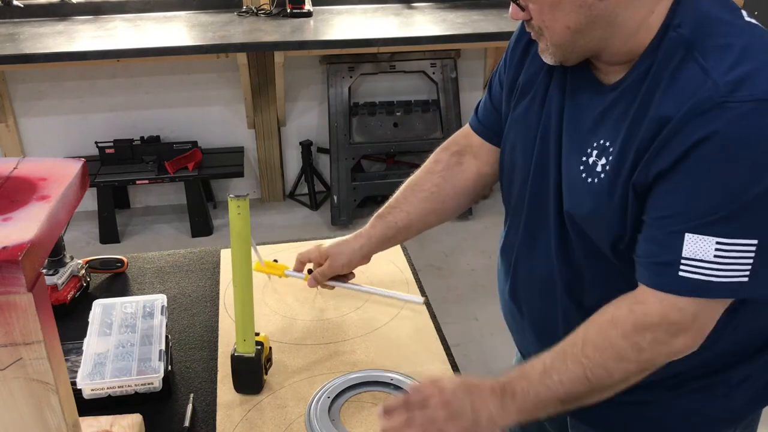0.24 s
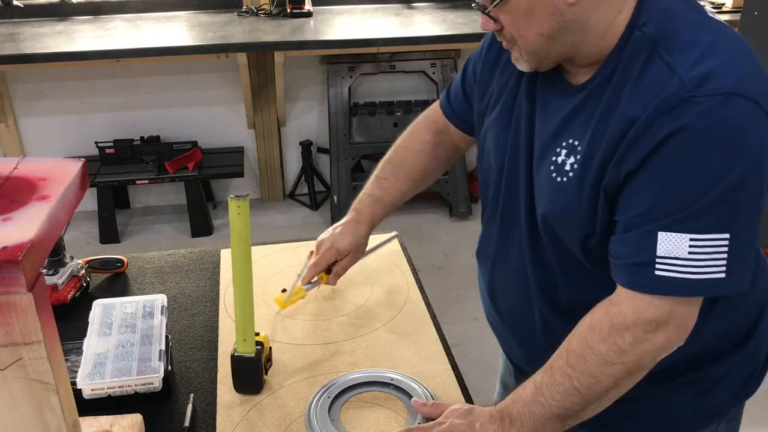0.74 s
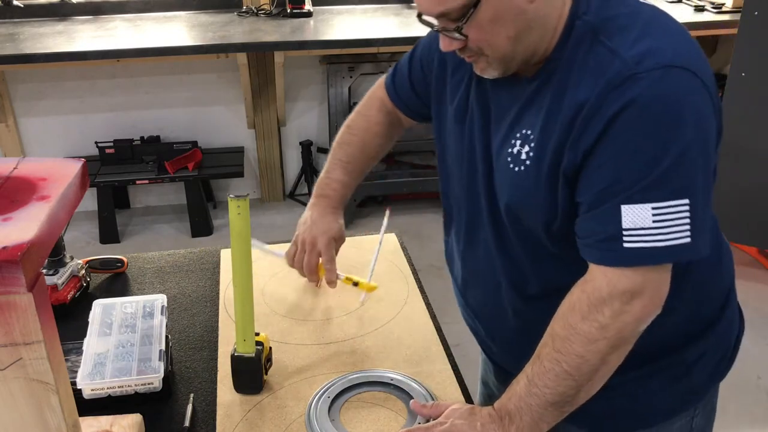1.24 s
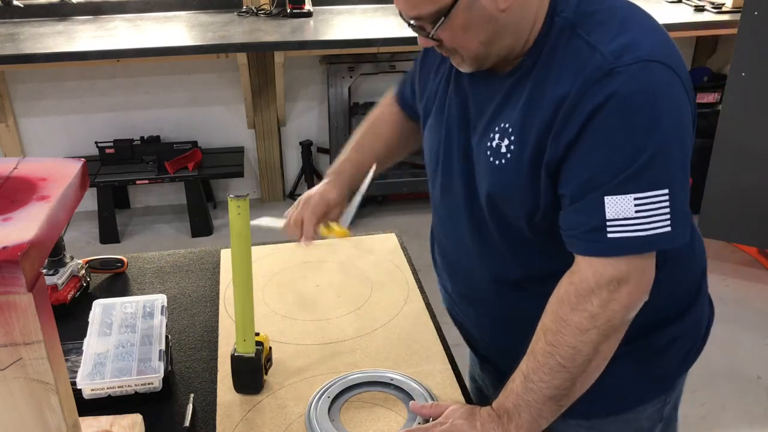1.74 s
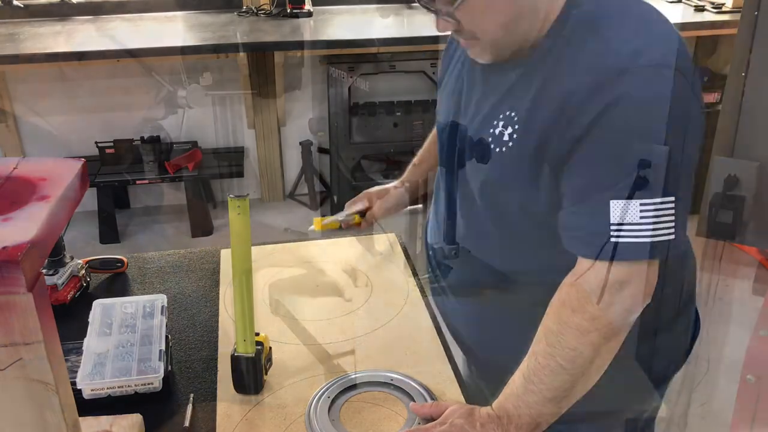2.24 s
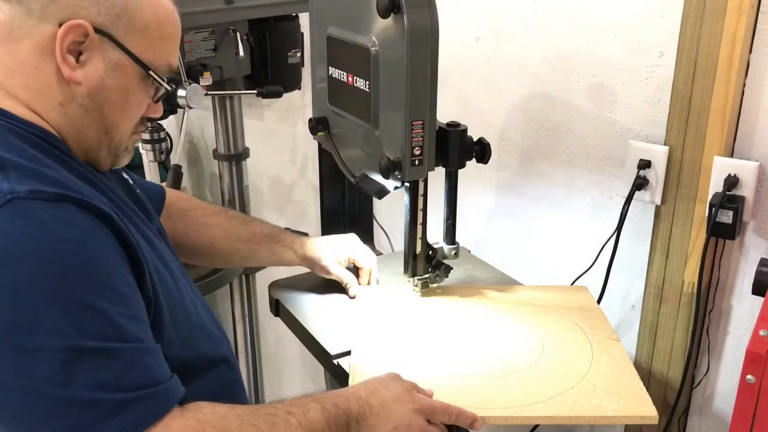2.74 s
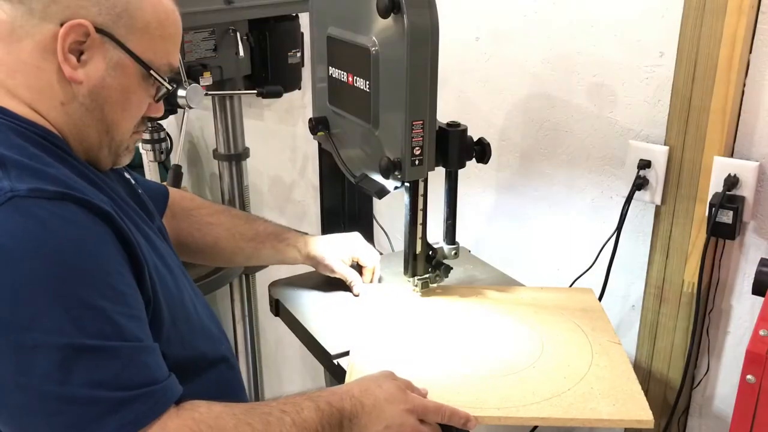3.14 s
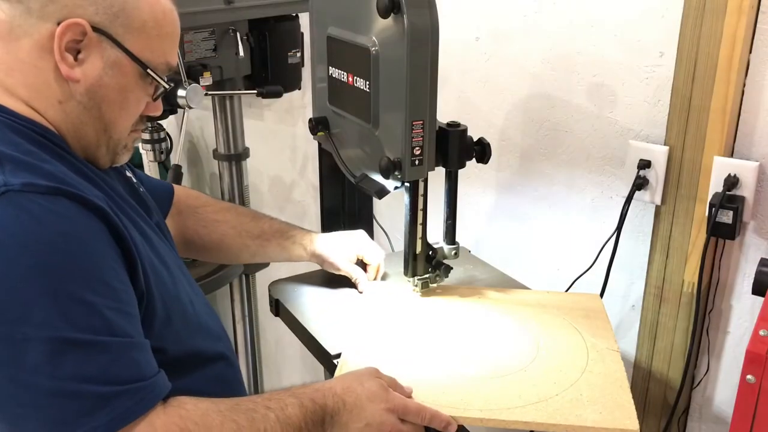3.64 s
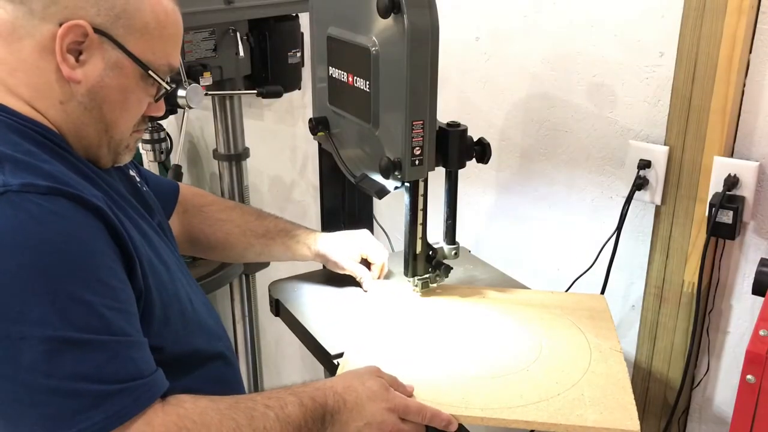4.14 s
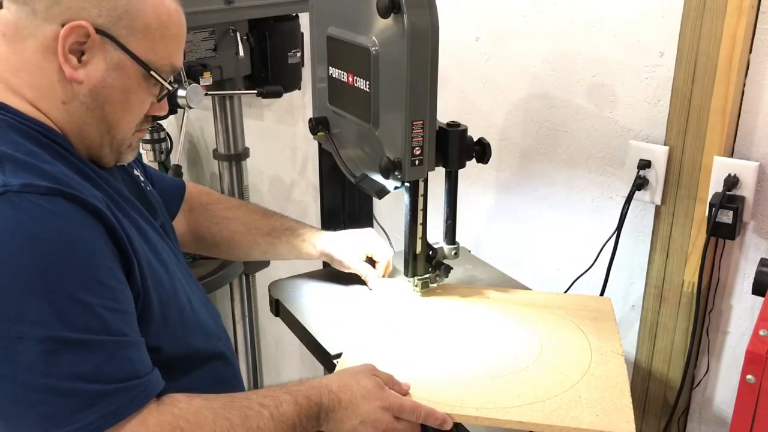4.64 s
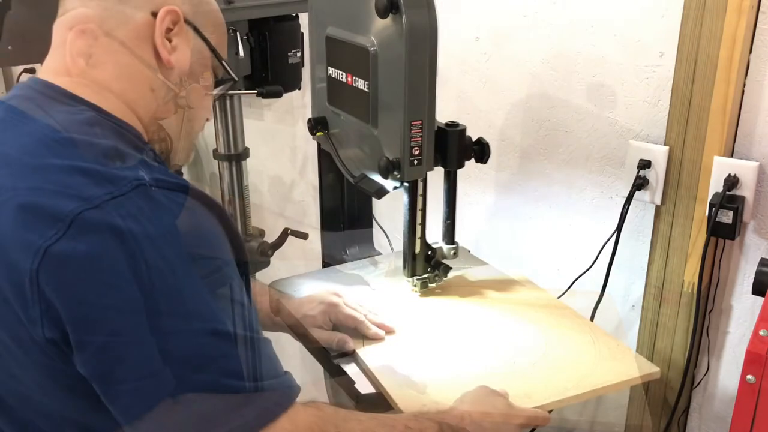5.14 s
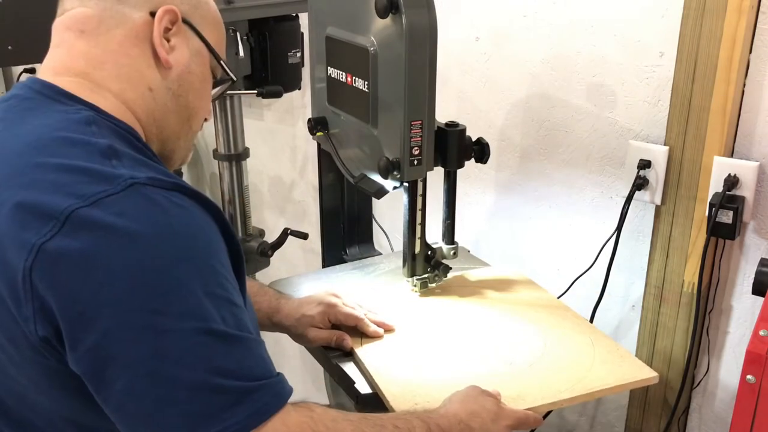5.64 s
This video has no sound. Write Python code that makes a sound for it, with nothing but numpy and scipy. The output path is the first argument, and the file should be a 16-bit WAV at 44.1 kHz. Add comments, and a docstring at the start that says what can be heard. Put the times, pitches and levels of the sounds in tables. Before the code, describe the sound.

After faint pencil scratching over a ventilation rumble, a band saw hums and rasps through a wooden board, its blade squealing briefly.

```python
"""A band saw cuts a curve in a board, heard close up in a home workshop.
Its motor hums, its teeth chop and tear the fibres, and the blade squeals as it twists in the kerf.
Before it, at the quiet bench, a pencil compass scratches a circle over the rumble of the ventilation.
The bench dissolves into one shot of the saw, and that shot into a second. The sound is mono."""
import sys
import numpy as np
from scipy import signal
from scipy.fft import rfft, irfft
from scipy.io import wavfile

SR = 44100
rng = np.random.default_rng(int(sys.argv[2]) if len(sys.argv) > 2 else 0)


def transcribe(u):
    """Save the signal u as a 16-bit wav file named by the first command-line argument.

    u: samples, shape (n,) or (channels, n), limited to [-1, 1]; the rate is SR.
    q: integer samples, one column per channel.
    """
    v = np.clip(np.atleast_2d(u).T, -1, 1)
    q = np.round(v * 32767).astype(np.int16)
    wavfile.write(sys.argv[1], SR, q)


N = 259308


def from_db(db):
    return 10 ** (np.asarray(db) / 20)


def unit_rms(x):
    return x / np.sqrt(np.mean(x ** 2) + 1e-20)


def curve(rows):
    """Straight lines through (seconds, value) rows, at every sample."""
    return np.interp(np.arange(N) / SR, *np.transpose(rows))


def dissolve(start_s, end_s):
    """A straight rise from 0 to 1."""
    return curve([(start_s, 0), (end_s, 1)])


def burst(middle_s, half_length_s):
    """A smooth rise from 0 to 1 and back."""
    along = np.clip((np.arange(N) / SR - middle_s) / half_length_s, -1, 1)
    return np.cos(np.pi / 2 * along) ** 2


def phase_of(hz):
    """Running phase in radians of a changing frequency."""
    return 2 * np.pi * np.cumsum(hz) / SR


def drift(rate_hz):
    """Smooth random wander with a spread of about 1."""
    step, settle = 40, 2000  # samples per point, points for the filter to settle
    pole = np.exp(-2 * np.pi * step * rate_hz / SR)
    noise = rng.standard_normal(N // step + settle + 2)
    slow = signal.lfilter([1], [1, -2 * pole, pole * pole], noise)[settle:]
    return np.interp(np.arange(N) / step, np.arange(len(slow)), unit_rms(slow))


def coloured(x, spectrum):
    """Shape a signal by (Hz, dB) rows; the result has rms 1."""
    hz, db = np.transpose(spectrum)
    bin_hz = np.maximum(np.fft.rfftfreq(N, 1 / SR), 1)
    gain = from_db(np.interp(np.log(bin_hz), np.log(hz), db))
    return unit_rms(irfft(rfft(x) * gain, N))


def resonances(modes, waver_db=0):
    """Random shaking rings each mode, with a strength that may waver."""
    out = 0
    for hz, width_hz, db in modes:
        b, a = signal.iirpeak(hz, hz / (1.5 * width_hz), fs=SR)
        ringing = signal.lfilter(b, a, rng.standard_normal(N))
        ringing = unit_rms(signal.lfilter(b, a, ringing))  # a second pass steepens the skirts
        out = out + from_db(db + waver_db * drift(8.3)) * ringing
    return out


def grains(per_s, spread_db):
    """Random clicks of uneven size."""
    clicks = (rng.random(N) < per_s / SR) * rng.standard_normal(N)
    size_db = spread_db * np.clip(rng.standard_normal(N), -2, 2)
    return unit_rms(clicks * from_db(size_db))


def ventilation(rumble_db=-38.5):
    """Room tone of the workshop: moving air rumbles and rings the duct."""
    # Spectrum of the air. Each row: frequency in Hz, relative level in dB.
    air_spectrum = [(15, -54), (25, -59), (59, -2), (111, -7), (145, 0), (170, -10), (206, -2.5), (270, -8),
                    (335, -11), (373, -9), (427, -19.5), (962, -23.5), (1040, -23), (3720, -35),
                    (16000, -57.5)]
    # Duct resonances. Each row: frequency in Hz, width in Hz, level in dB.
    duct_modes = [(65, 12, -51), (136.4, 8.4, -48.5), (219.3, 10, -45.5), (269, 6.6, -48),
                  (296, 10.4, -47.5), (362, 22, -54.5), (452, 19, -54.5), (1020, 6.2, -61), (1110, 50, -72),
                  (3270, 60, -70)]
    rumble = coloured(rng.standard_normal(N), air_spectrum)
    return from_db(rumble_db) * rumble + resonances(duct_modes)


def pencil_compass(grain_db=-7, fade_db_per_s=65):
    """At the bench, the lead scratches over the grain and rings board and compass, then lifts."""
    # Pressure of the lead through one sweep. Each row: time in seconds, gain in dB.
    pressure = [(0, -74), (.18, -68), (.43, -62.5), (.54, -66), (.71, -58), (.9, -65.5), (1.1, -58.5),
                (1.25, -64.5), (1.39, -60.5)]
    # Resonances of board and compass legs. Each row: frequency in Hz, width in Hz, relative level in dB.
    compass_modes = [(514, 210, 5), (1500, 790, -1.5), (4170, 420, -2.5), (6000, 400, -10),
                     (6650, 480, -7.5), (7070, 300, -11), (9700, 500, -16), (11950, 700, -11),
                     (13100, 700, -11), (15000, 750, -11)]
    scratch = from_db(grain_db) * grains(per_s=7000, spread_db=2.5)
    ringing = resonances(compass_modes, waver_db=3.0)
    since_lift_s = np.maximum(np.arange(N) / SR - pressure[-1][0], 0)
    return (scratch + ringing) * from_db(curve(pressure) - fade_db_per_s * since_lift_s)


def motor(second_shot, hum_hz=335.05, wobble=0.00038, flutter_db=0.4, gain_db=-0.02):
    """The motor hums with fluttering overtones, over steady tones of the drive and frame."""
    # Slow swell of the fundamental. Each row: time in seconds, gain in dB.
    swell = [(3.7, 1), (4.75, -1.1), (5.05, -0.5), (5.3, 0.6), (5.88, -0.1)]
    # Harmonics of the hum. Each row: multiple, level in dB in the first shot, level in dB in the second.
    harmonics = [(1, -21, -18), (2, -40, -38), (3, -30.7, -31), (4, -35, -38), (5, -37, -31), (6, -32, -33),
                 (7, -44, -37), (8, -36, -39), (9, -33, -33), (10, -31, -36), (11, -44, -56),
                 (13, -43, -48), (18, -42, -47), (30, -51, -56), (36, -44, -45)]
    # Tones of the drive and frame. Each row: frequency in Hz, level in dB.
    frame_tones = [(120, -47), (216, -46), (458, -52), (884, -48), (1460, -40.5), (1560, -45)]
    phase = phase_of(hum_hz * (1 + wobble * drift(6.3)))
    out = 0
    for order, first_db, second_db in harmonics:
        unrest_db = curve(swell) + 0.18 * drift(8.7) if order == 1 else flutter_db * drift(10.0)
        level_db = gain_db + first_db + (second_db - first_db) * second_shot + unrest_db
        out = out + from_db(level_db) * np.sin(order * phase + rng.uniform(0, 2 * np.pi))
    for hz, db in frame_tones:
        strength = from_db(db + 2.2 * drift(3.8))
        out = out + strength * np.sin(phase_of(hz + 1.2 * drift(3.7)))
    return np.sqrt(2) * out


def housing(gain_db=-1.24):
    """The steady cut shakes the housing and the blade, and they ring."""
    # Their resonances. Each row: frequency in Hz, width in Hz, relative level in dB.
    housing_modes = [(154, 33, -39), (1667, 130, -29), (3375, 70, -32.5), (6920, 590, -35),
                     (11500, 260, -38.5)]
    return from_db(gain_db) * resonances(housing_modes)


def fibre_rasp(tooth_phase, level_db=-18, tooth_depth=0.24, flicker_db=-0.08):
    """Fibres snap in dense clicks, most as a left- or right-set tooth enters the wood."""
    # What board, blade and table radiate. Each row: frequency in Hz, relative level in dB.
    rasp_spectrum = [(50, -18.5), (220, -6.5), (500, -6.5), (750, -7), (1200, 0), (1700, 0.5), (2300, 0.5),
                     (3400, 1.5), (4700, -2), (5900, -0.5), (7600, -8), (8700, -5.5), (10400, -11.5),
                     (12400, -7), (15500, -10.5)]
    entering = 1 + tooth_depth * np.cos(2 * tooth_phase)
    snaps = grains(per_s=26000, spread_db=0.6) * entering * from_db(flicker_db * drift(61))
    return from_db(level_db) * coloured(snaps, rasp_spectrum)


def tooth_whine(tooth_phase, second_shot, weave_hz=8.5, weave_depth=0.5, chatter_db=2.53, slip_rad=.024):
    """The teeth strike in a steady pattern; each harmonic throbs as the blade weaves in the kerf."""
    # Tooth harmonics. Each row: multiple, level in dB in the first shot, level in dB in the second.
    harmonics = [(2, -31.5, -36.5), (4, -34.5, -32.5), (6, -30, -27.5), (7, -46, -39), (8, -34, -38),
                 (9, -39.5, -33), (10, -40, -38), (12, -36, -32.5), (14, -42, -37), (15, -43, -47),
                 (16, -43, -38), (18, -45, -50), (20, -43, -40), (22, -43, -40), (24, -49, -44),
                 (26, -49, -40)]
    # The teeth dig in and one harmonic rings out.
    # Each row: middle in seconds, half-length in seconds, multiple, level in dB.
    bites = [(2.75, 0.19, 2, -24.5), (2.76, .08, 4, -29), (2.85, 0.22, 8, -27.5), (3.02, 0.056, 4, -29),
             (3.28, 0.19, 8, -28), (3.61, .07, 4, -27.5), (3.68, 0.087, 6, -24), (3.9, 0.15, 2, -26),
             (4.003, .07, 8, -23.5), (4.19, .05, 4, -25), (4.352, .06, 12, -29), (4.38, .06, 2, -25),
             (4.385, .05, 4, -26.5), (4.91, .1, 6, -24), (5.46, .08, 6, -21.5), (5.852, 0.055, 6, -17)]
    out = 0
    for order, first_db, second_db in harmonics:
        throb = 1 + weave_depth * np.sin(phase_of(weave_hz * (1 + 0.4 * drift(4.09))))
        strength = throb * from_db(first_db + (second_db - first_db) * second_shot)
        for middle_s, half_length_s, multiple, db in bites:
            if round(multiple) == order:
                strength = strength + (from_db(db) - strength) * burst(middle_s, half_length_s)
        slipped_phase = tooth_phase + slip_rad * drift(29)  # small slips blur the higher harmonics
        tone = np.sin(order * slipped_phase + rng.uniform(0, 2 * np.pi))
        out = out + strength * from_db(chatter_db * drift(37)) * tone
    return np.sqrt(2) * out


def blade_squeals(sag_hz_per_s=250, quaver_hz=14, rough_db=3.5, gain_db=-4):
    """The twisted blade rubs the side of the kerf and sings; the rubbing drags each squeal flat. The last row
    is no squeal: it is a brief tone near 3440 Hz that joins the sixth tooth harmonic as it rings out at 5.85 s."""
    # Each row: middle in seconds, half-length in seconds, pitch in Hz, relative level in dB. The last row adds
    # to the sixth tooth harmonic ringing out near 5.85 s.
    squeals = [(2.608, .067, 3375, -29), (2.747, 0.054, 3330, -20), (2.867, 0.19, 3324, -20.5),
               (3.085, 0.026, 3350, -20.5), (3.445, 0.1, 3316, -21), (3.63, 0.097, 3360, -19.5),
               (3.723, 0.044, 3335, -24), (3.791, 0.043, 3325, -14), (3.876, 0.029, 3360, -16.5),
               (4.058, .06, 3350, -18), (4.126, .076, 3335, -22), (4.233, 0.029, 3330, -19),
               (4.425, 0.076, 3350, -18), (4.6, .05, 3325, -27), (5.42, 0.1, 3390, -21),
               (5.85, 0.059, 3440, -22.5)]
    t = np.arange(N) / SR
    quaver = quaver_hz * drift(45.5)
    out = 0
    for middle_s, half_length_s, hz, db in squeals:
        pitch_hz = hz - sag_hz_per_s * (t - middle_s) + quaver
        out = out + from_db(db) * burst(middle_s, half_length_s) * np.sin(phase_of(pitch_hz))
    return np.sqrt(2) * out * from_db(rough_db * drift(34) + gain_db)


def band_saw(first_tooth_hz=576.6, second_tooth_hz=572.3, band_wobble=0.0011):
    """One close shot of the saw dissolves into a second, with slightly lower tooth pitch."""
    second_shot = dissolve(4.84, 5.28)
    tooth_hz = np.interp(second_shot, [0, 1], [first_tooth_hz, second_tooth_hz])
    tooth_phase = phase_of(tooth_hz * (1 + band_wobble * drift(7.92)))
    cutting = fibre_rasp(tooth_phase) + tooth_whine(tooth_phase, second_shot) + housing()
    dip = np.hypot(1 - second_shot, second_shot)  # unrelated shots add in power: 3 dB down mid-dissolve
    return motor(second_shot) + dip * cutting + blade_squeals()


def scene():
    """The quiet bench dissolves into the saw; both channels are alike."""
    saw_share = dissolve(2.204, 2.684)
    bench = ventilation() + pencil_compass()
    mono = (1 - saw_share) * bench + saw_share * band_saw()
    return np.array([mono, mono])


def record(dry, low_cut_hz=35, high_cut_hz=15620):
    """The microphone drops the deep bass; the top is cut steeply."""
    low_cut = signal.butter(2, low_cut_hz, "high", fs=SR, output="sos")
    high_cut = signal.ellip(12, 0.1, 90, high_cut_hz, fs=SR, output="sos")
    return signal.sosfilt(high_cut, signal.sosfilt(low_cut, dry))


dry = scene()
out = record(dry)
transcribe(out)
```